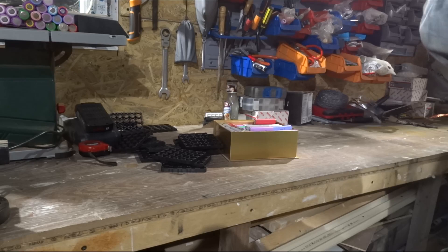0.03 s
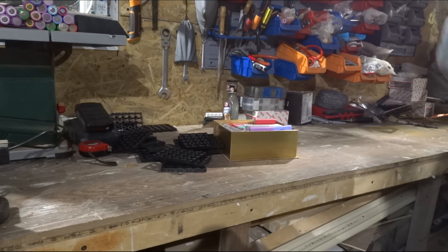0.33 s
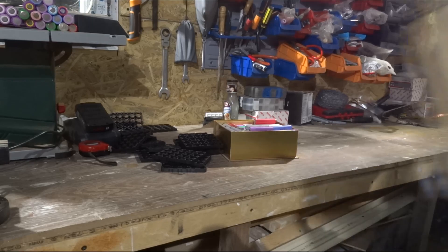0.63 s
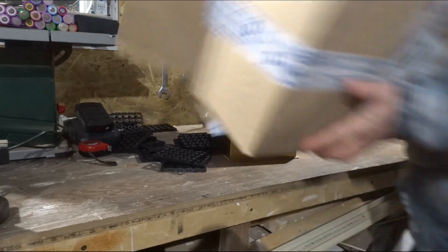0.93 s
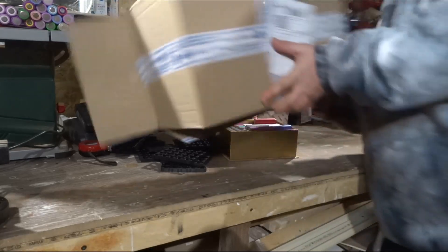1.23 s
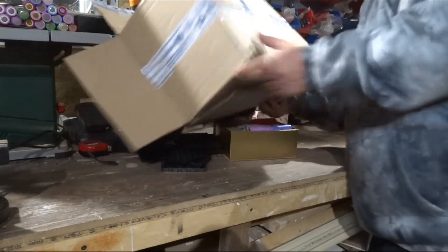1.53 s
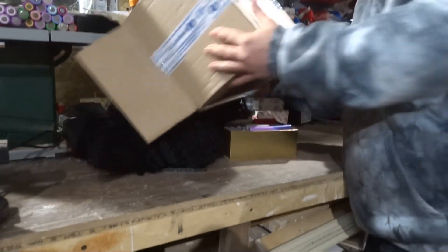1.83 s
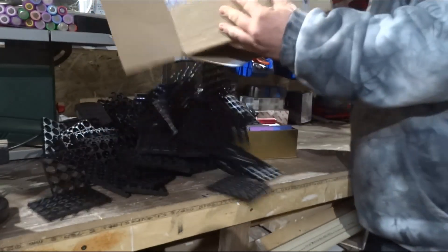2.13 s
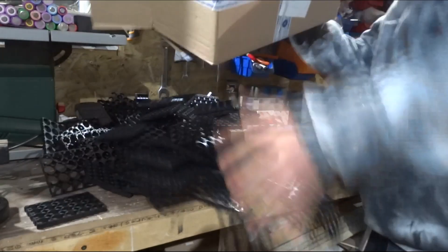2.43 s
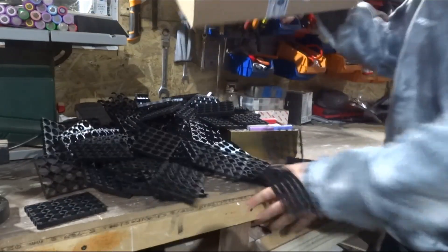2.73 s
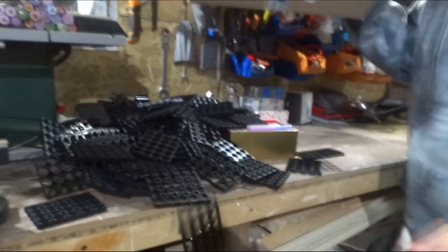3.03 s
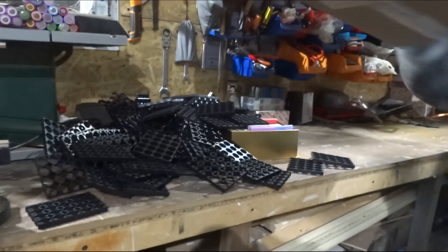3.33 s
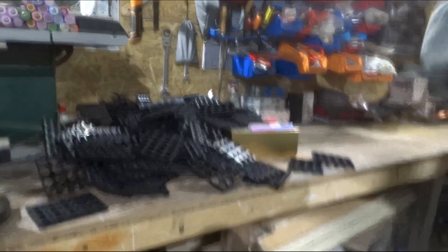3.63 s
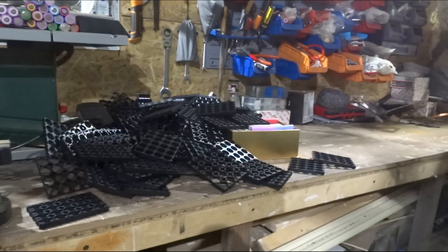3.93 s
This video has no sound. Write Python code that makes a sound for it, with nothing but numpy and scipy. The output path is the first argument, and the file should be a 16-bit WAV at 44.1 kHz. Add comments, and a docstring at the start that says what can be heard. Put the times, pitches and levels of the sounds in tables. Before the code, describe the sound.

Plastic pieces pour and clatter close to the microphone in a small workshop. Clicks and dull knocks in a cardboard box lead to a bright rush onto a wooden bench, ending with stragglers tumbling off the heap.

```python
"""A cardboard box of light plastic grids is tipped out over a wooden bench in a small workshop.
First the pieces shift and click in the box and knock its wall. From 1.2 s they slide down the
cardboard and pour onto the bench: a dense clatter of ribs cracking, ringing and flexing, flattened
by the close recorder's limiter. From 2.3 s single landings stand out, with thuds on the wood and
brief rasps of rib over rib. The pour thins and stragglers tumble off the heap until 4 s."""
import sys
import numpy as np
from scipy import signal
from scipy.fft import rfft, irfft
from scipy.io import wavfile
from scipy.ndimage import uniform_filter1d

SR = 44100
rng = np.random.default_rng(int(sys.argv[2]) if len(sys.argv) > 2 else 0)


def to_wav(sig):
    """Store sig (one row per channel, or 1-D mono) as 16-bit WAV at the path in sys.argv[1].

    Samples outside -1..1 are clipped; the rate is SR.
    """
    pcm = np.clip(np.atleast_2d(sig), -1, 1) * 32767
    pcm = np.round(pcm).astype(np.int16)
    wavfile.write(sys.argv[1], SR, pcm.T)  # frames by channels


N = 4 * SR

# load shifts in the box: start_s, length_s, plastic_db, cardboard_db
LOAD_SHIFTS = [(.059, 0.056, -23.5, -29), (.182, 0.044, -69, -43), (.25, 0.021, -42, -34.5),
               (.285, 0.037, -39, -39.5), (.322, 0.021, -35, -28.5), (.475, .02, -44.5, -38),
               (.59, 0.003, -29.5, -56), (.63, .03, -34.5, -58), (.68, 0.02, -35.5, -40),
               (.732, 0.012, -29.5, -28), (.807, 0.012, -31, -41), (.8225, 0.0047, -17, -20.5),
               (.875, 0.072, -29, -56), (.997, 0.025, -23.5, -29), (1.04, 0.033, -28, -40),
               (1.095, 0.016, -31.5, -32.5), (1.132, 0.014, -23.5, -33), (1.158, 0.021, -22.5, -24.5),
               (1.22, 0.023, -23.5, -44), (1.242, 0.088, -24.5, -23)]
# dull blows on box wall and bench top: start_s, length_s, level_db
WALL_KNOCKS = [(.733, .01, -29), (.8995, .012, -16), (.989, .022, -20), (1.132, .009, -26),
               (1.275, .025, -25), (1.475, .015, -26)]
BENCH_THUDS = [(1.641, 0.0081, -27), (2.05, 0.0078, -28), (2.44, 0.0087, -34.5), (2.79, 0.018, -29.5),
               (2.839, 0.012, -18), (2.955, 0.025, -29), (3.025, .012, -31), (3.103, 0.0047, -34),
               (3.205, 0.017, -30), (3.295, 0.0067, -35), (3.441, 0.0047, -25), (3.511, 0.011, -30.5)]
# pieces land and tumble: start_s, length_s, plastic_db, bench_db
HEAP_LANDINGS = [(1.613, .045, -33, -31.5), (2.325, 0.017, -13, -37.5), (2.405, 0.0068, -7.5, -39),
                 (2.457, 0.0078, -8.5, -28), (2.545, 0.058, -16.5, -55), (2.601, .06, -18.5, -32),
                 (2.698, 0.022, -20.5, -36), (2.756, 0.038, -18.5, -24.5), (2.8, 0.019, -40, -26),
                 (2.847, 0.03, -15, -29.5), (2.934, 0.028, -22.5, -30), (2.948, 0.04, -21.5, -23.5),
                 (3.038, 0.007, -23, -45), (3.068, 0.075, -18.5, -33.5), (3.155, 0.073, -27, -39),
                 (3.219, 0.025, -23.5, -42), (3.262, 0.035, -25.5, -35), (3.3297, 0.025, -14.5, -34),
                 (3.377, 0.022, -43, -33), (3.427, 0.018, -17.5, -20), (3.457, 0.028, -25, -31.5),
                 (3.506, 0.0052, -26.5, -24), (3.574, 0.0084, -32, -39), (3.586, 0.022, -17.5, -27.5),
                 (3.632, 0.013, -28, -29.5), (3.678, 0.029, -27, -35.5), (3.709, .016, -23, -24.5),
                 (3.753, 0.013, -31, -39), (3.797, 0.048, -35.5, -40), (3.866, 0.027, -29, -39.5)]
# plastic edges snap: start_s, peak_db
EDGE_SNAPS = [(.088, -26), (0.096, -29), (.12, -27), (0.34, -10), (.591, -24), (1.133, -1.5), (3.511, -11),
              (3.867, -39), (3.894, -10)]
# grid zips over grid: start_s, length_s, first_hz, last_hz, level_db
RIB_RASPS = [(1.158, 0.015, 5900, 5100, -23.5), (1.633, .014, 8200, 6400, -23),
             (2.557, 0.0054, 2500, 2400, -25), (2.562, 0.035, 7700, 6700, -18.5),
             (2.604, 0.087, 6600, 3900, -28), (2.82, 0.046, 1900, 1750, -27.5),
             (2.986, 0.018, 6900, 5300, -23.5), (3.118, 0.088, 8850, 8830, -28),
             (3.228, 0.009, 9500, 9300, -24.5), (3.427, 0.01, 6700, 6300, -17)]
# slide along the cardboard, pour onto the heap: time_s, level_db
SLIDE_LEVEL = [(.06, -47.5), (.4, -40), (.55, -47.5), (.62, -42), (.96, -41), (1.1, -36.5), (1.22, -35.5),
               (1.27, -22), (1.35, -22.5), (1.47, -17), (1.57, -33.5), (1.68, -25), (1.95, -39),
               (2.15, -50), (2.6, -46), (3.6, -40), (4, -54)]
POUR_LEVEL = [(1.2, -62), (1.32, -18), (1.46, -29), (1.51, -18.5), (1.7, -14.5), (1.95, -17), (2.22, -18),
              (2.3, -20), (2.49, -15.5), (2.53, -19), (2.57, -42), (2.7, -18), (2.76, -29), (3.5, -46.5),
              (4, -52)]
# stereo position of the action: time_s, left_minus_right_db
PAN = [(0, -2.5), (.75, -0.7), (1.25, 0.7), (2.2, 0.7), (3.2, .1), (4, -0.8)]
# contact spectra: frequency_hz, level_db
CARDBOARD_SPECTRUM = [(30, -30), (80, -26), (130, -25.5), (180, -14.5), (290, -2), (500, 3.5), (900, -7.5),
                      (1400, 1), (2100, -2.5), (3200, -6.5), (5000, -11), (11000, -52)]
KNOCK_SPECTRUM = [(30, -24), (90, -28), (140, -19), (190, -4.5), (280, 1.5), (450, 3), (630, 6),
                  (900, -0.5), (1200, 2), (1700, -5), (2600, -14), (6000, -21), (11000, -50)]
LANDING_SPECTRUM = [(30, -37), (80, -43), (140, -17.5), (190, -11), (330, -5.5), (460, -3), (570, -5),
                    (760, 1.5), (1000, -1.5), (1350, 1.5), (2000, -2), (3200, 1), (6000, -32), (11000, -22)]
THUD_SPECTRUM = [(30, -35), (90, -37), (150, -24.5), (250, -9), (420, -5), (650, 2), (1200, -6.5),
                 (1800, -13), (2600, -19), (6000, -38), (11000, -57)]
PLASTIC_SPECTRUM = [(100, -58), (400, -22), (1000, -12.5), (2000, -9), (3100, -2.5), (4300, -4), (5500, 0),
                    (7600, 2), (8600, -2), (9500, -3.5), (10300, -8.5), (11000, -7.5)]
HEAP_SPECTRUM = [(40, -52), (150, -43), (280, -27), (420, -15.5), (560, 0.5), (750, 2.5), (1050, -1.5),
                 (1400, 2), (2000, 2), (4000, -9), (11000, -38)]
POUR_SPECTRUM = [(100, -66), (300, -42), (500, -15), (1000, -12.5), (2000, -12.5), (2700, -6.5), (3100, -1),
                 (3500, -7), (4300, -4), (4900, -5), (5500, .5), (6300, -2), (7100, 1), (8000, -0.5),
                 (8500, -5.5), (9400, -4.5), (10200, -11), (11000, -12.5)]
# panel modes: pitch_hz, level_db, t60_s
BOX_WALL_MODES = [(297, 0.5, 0.09), (480, -7, 0.043), (637, 8.5, 0.093), (730, 20.5, 0.017),
                  (1149, 12.5, 0.08), (1250, 2, 0.11), (1700, -25, 0.048), (1900, -14, .04)]
BENCH_TOP_MODES = [(180, 3, 0.12), (373, -12, 0.043), (500.5, 7, 0.08), (600, -6, 0.031), (800, -7, .06),
                   (1243, 11, 0.11), (1820, -20, 0.046)]

CLICKS_PER_S, POUR_PER_S, BODY_PER_S, KNOCK_PER_S = 2600, 6000, 1500, 5000
CLATTER_DB_PER_S, BENCH_DB_PER_S, FAST_DB_PER_S = 495, 598, 905  # release rates
RIB_RING = dict(low_hz=1217, high_hz=10994, t60_s=0.034, ring_db=-0.5)
FLEX_RING = dict(low_hz=343, high_hz=2637, t60_s=0.03, ring_db=-1.5)
TIME_S = np.arange(N) / SR


def from_db(db):
    """Decibels to gain."""
    return 10 ** (np.asarray(db) / 20)


def unit(x):
    """Scale to unit energy."""
    return x / np.sqrt(np.sum(x ** 2) + 1e-20)


def through(x, response):
    """Convolve, cut to N samples."""
    return signal.oaconvolve(x, response)[:N]


def curve(rows):
    """Gain over time from (time_s, level_db) points."""
    return from_db(np.interp(TIME_S, *np.transpose(rows)))


def bursts(rows, release_db_per_s, column=-1, accent_db=1.5, accent_s=0.0077):
    """Event envelope: hardest at first touch, hold, release. Level comes from `column`."""
    power = np.zeros(N)
    for row in rows:
        start, length_s = int(row[0] * SR), row[1]
        age_s = TIME_S[:min(N - start, SR // 2)]
        fall_db = release_db_per_s * np.maximum(age_s - length_s, 0)
        level_db = row[column] + accent_db * np.exp(-age_s / accent_s) - fall_db
        power[start:start + len(age_s)] += from_db(level_db) ** 2
    return np.sqrt(power)


def colour(spectrum, size=4096):
    """Minimum-phase impulse response of a spectrum."""
    hz, db = np.transpose(spectrum)
    bins_hz = np.maximum(np.arange(size // 2 + 1) * SR / size, 1)
    gain = from_db(np.interp(np.log(bins_hz), np.log(hz), db))
    cepstrum = irfft(np.log(gain))
    cepstrum[1:size // 2] *= 2
    cepstrum[size // 2 + 1:] = 0
    return unit(irfft(np.exp(rfft(cepstrum))))


def decay(t60_s):
    """Time axis and envelope of a 60 dB decay."""
    t = np.arange(int(t60_s * SR) + 2) / SR
    return t, np.exp(-np.log(1000) * t / t60_s)


def contacts(per_s, spread_db=3.5):
    """Random clicks of uneven size, rms one."""
    sizes = from_db(spread_db * np.minimum(rng.exponential(1, N), 3))
    signs = rng.choice([-1, 1], N)
    hits = rng.random(N) < per_s / SR
    return np.sqrt(N) * unit(sizes * signs * hits)


def panel(force, per_s, modes, spectrum, ring_db=-8.5):
    """Contacts on a panel: broad thump plus ringing modes."""
    ringing = np.zeros(SR)
    for k, (pitch_hz, level_db, t60_s) in enumerate(modes):
        t, fade = decay(t60_s)
        mode = unit(np.sin(2 * np.pi * pitch_hz * t) * fade)
        ringing[:len(t)] += (-1) ** k * from_db(level_db) * mode
    thump = colour(spectrum)
    response = from_db(ring_db) * unit(through(ringing, thump))
    response[:len(thump)] += thump
    return through(force * contacts(per_s), unit(response))


def grids(force, per_s, spectrum, low_hz, high_hz, t60_s, ring_db):
    """Each contact cracks and rings one grid briefly at its own pitch."""
    clicks = force * contacts(per_s)
    pitch_hz = rng.uniform(low_hz, high_hz, N)
    t, fade = decay(t60_s)
    fade = np.sqrt(2) * unit(fade)
    rings = np.zeros(N + len(t))
    for i in np.flatnonzero(clicks):
        rings[i:i + len(t)] += clicks[i] * fade * np.sin(2 * np.pi * pitch_hz[i] * t)
    ring_gain = from_db(ring_db)  # ring against click, within the band
    band_gain = np.sqrt((high_hz - low_hz) / (SR / 2))
    struck = clicks + ring_gain * band_gain * rings[:N]
    return through(struck, colour(spectrum)) / np.hypot(1, ring_gain)


def workshop(x, spots=8, hop_s=0.011, near_t60_s=0.056, tail_t60_s=0.25, side_db=-7):
    """Direct sound, quick reflections, short tail. The sound hops among spots with their own echoes."""
    t, tail = decay(tail_t60_s)
    near = np.exp(-np.log(1000) * t / near_t60_s)
    fade = np.hypot(from_db(-5) * unit(near * (t > .001)), from_db(-15) * unit(tail * (t > .004)))
    spot = rng.integers(0, spots, N)[(TIME_S / hop_s).astype(int)]
    mid, side = x, 0
    for k in range(spots):
        share = uniform_filter1d(uniform_filter1d(1. * (spot == k), size=200), size=200)
        here = x * np.sqrt(np.abs(share))
        mid_echoes, side_echoes = rng.standard_normal((2, N))[:, :len(t)] * fade
        mid = mid + through(here, mid_echoes)
        side = side + from_db(side_db) * through(here, side_echoes)
    return np.array([mid + side, mid - side]) / np.sqrt(1 + np.sum(fade ** 2))


def box(slide):
    """The load scrapes and knocks the cardboard wall."""
    scrape = np.hypot(slide, bursts(LOAD_SHIFTS, CLATTER_DB_PER_S))
    knocks = bursts(WALL_KNOCKS, FAST_DB_PER_S)
    return (panel(scrape, BODY_PER_S, BOX_WALL_MODES, CARDBOARD_SPECTRUM)
            + panel(knocks, KNOCK_PER_S, BOX_WALL_MODES, KNOCK_SPECTRUM))


def bench():
    """Grids bend and clack as they land; solid blows ring the wooden top."""
    landings = bursts(HEAP_LANDINGS, BENCH_DB_PER_S)
    thuds = bursts(BENCH_THUDS, FAST_DB_PER_S)
    return (grids(landings, BODY_PER_S, LANDING_SPECTRUM, **FLEX_RING)
            + panel(thuds, KNOCK_PER_S, BENCH_TOP_MODES, THUD_SPECTRUM))


def rasps(width_hz=340):
    """Rib slips over rib at an unsteady, falling rate: a brief, rough tone."""
    low_pass = signal.butter(2, width_hz / 2, fs=SR, output="sos")
    out = np.zeros(N)
    for row in RIB_RASPS:
        start_s, length_s, first_hz, last_hz, _ = row
        pitch_hz = np.interp(TIME_S, [start_s, start_s + length_s], [first_hz, last_hz])
        phase = 2 * np.pi * np.cumsum(pitch_hz) / SR
        noise_i, noise_q = signal.sosfilt(low_pass, rng.standard_normal((2, N)))
        tone = np.sqrt(N) * unit(noise_i * np.cos(phase) + noise_q * np.sin(phase))
        out += tone * bursts([row], FAST_DB_PER_S)
    return out


def snaps():
    """Plastic edges snap: single hard clicks."""
    clicks, crack = np.zeros(N), colour(PLASTIC_SPECTRUM)
    for start_s, peak_db in EDGE_SNAPS:
        clicks[int(start_s * SR)] = from_db(peak_db)
    return through(clicks, crack / np.abs(crack).max())


def pieces(slide, slide_db=-1.5):
    """Rib clicks on rib as pieces shift, slide and land."""
    clatter = bursts(LOAD_SHIFTS + HEAP_LANDINGS, CLATTER_DB_PER_S, column=2)
    force = np.hypot(clatter, slide * from_db(slide_db))
    return grids(force, CLICKS_PER_S, PLASTIC_SPECTRUM, **RIB_RING)


def pour(heap_db=-13.5):
    """A stream of grids clatters down; the heap flexes under it, lower in pitch."""
    force = curve(POUR_LEVEL)
    return (grids(force, POUR_PER_S, POUR_SPECTRUM, **RIB_RING)
            + grids(force * from_db(heap_db), BODY_PER_S, HEAP_SPECTRUM, **FLEX_RING))


def scene():
    """Plastic, box and bench in the room, drifting slightly across the stereo field."""
    slide = curve(SLIDE_LEVEL)
    sources = pieces(slide) + pour() + box(slide) + bench() + rasps() + snaps()
    left_gain = np.sqrt(curve(PAN))
    return workshop(sources) * np.array([left_gain, 1 / left_gain])


def record(dry, limit_db=-15.5, window_s=0.0026, release_db_per_s=169, mute_s=0.058, cutoff_hz=11050):
    """Fast limiter, muted start, soft clip, low-pass."""
    window = int(window_s * SR)
    power = uniform_filter1d(np.mean(dry ** 2, axis=0), window)
    over_db = np.maximum(10 * np.log10(np.abs(power) + 1e-12) - limit_db, 0)
    fall_db = release_db_per_s * TIME_S
    cut_db = np.maximum.accumulate(over_db + fall_db) - fall_db
    limited = dry * from_db(-uniform_filter1d(cut_db, window)) * (TIME_S > mute_s)
    low_pass = signal.firwin(401, cutoff_hz, window=("kaiser", 7), fs=SR)
    return signal.oaconvolve(np.tanh(limited), low_pass[None], mode="same", axes=1)


dry = scene()
out = record(dry)
to_wav(out)
```